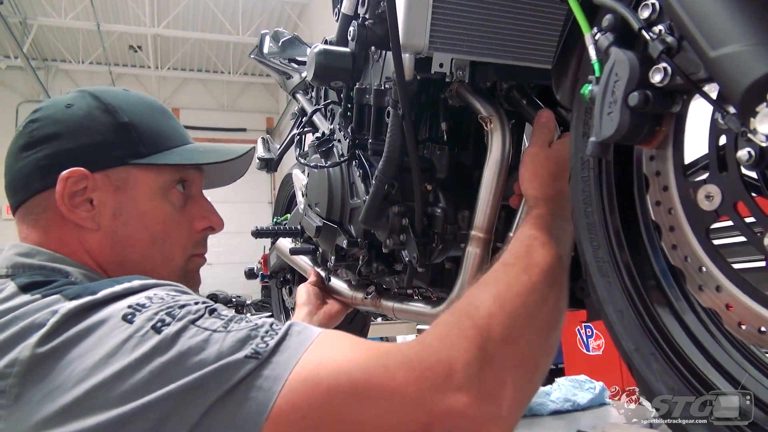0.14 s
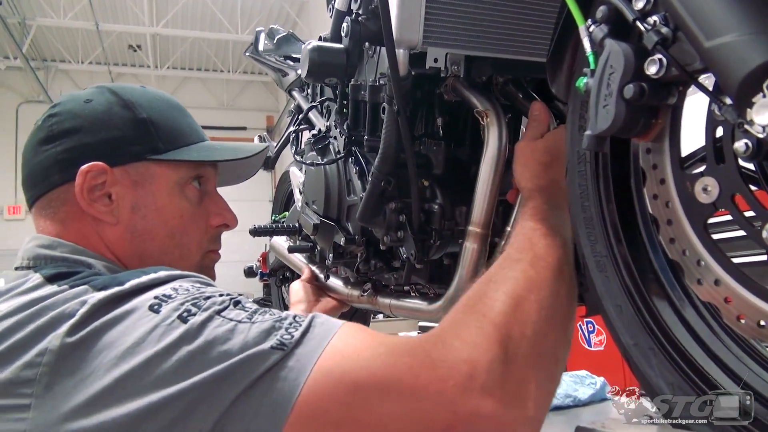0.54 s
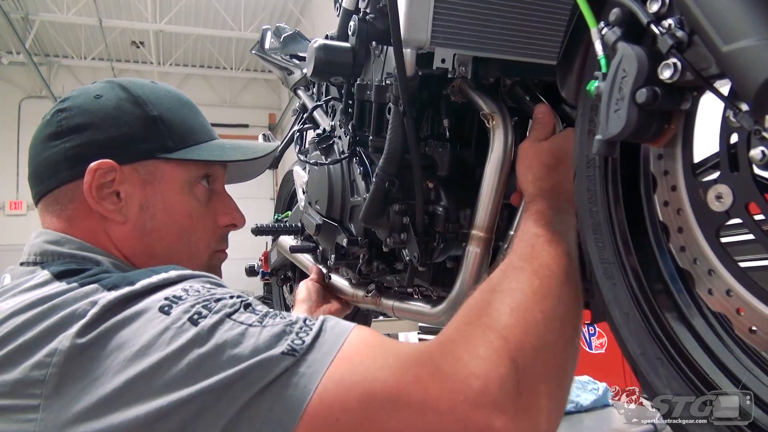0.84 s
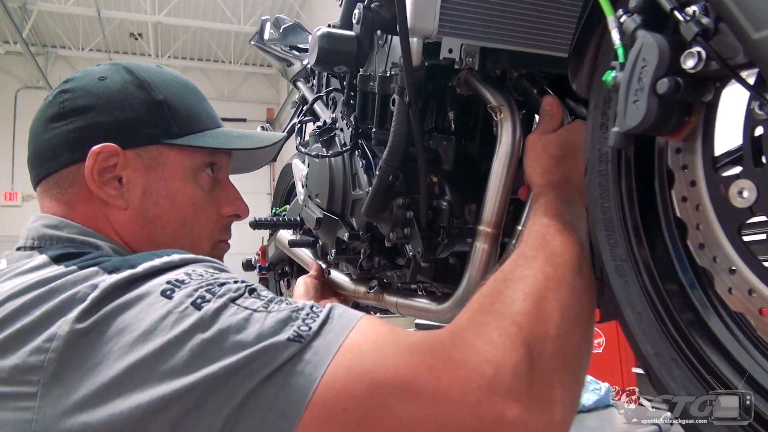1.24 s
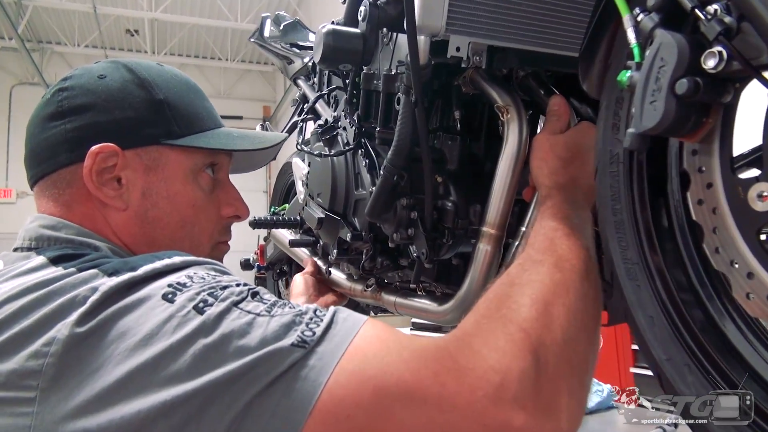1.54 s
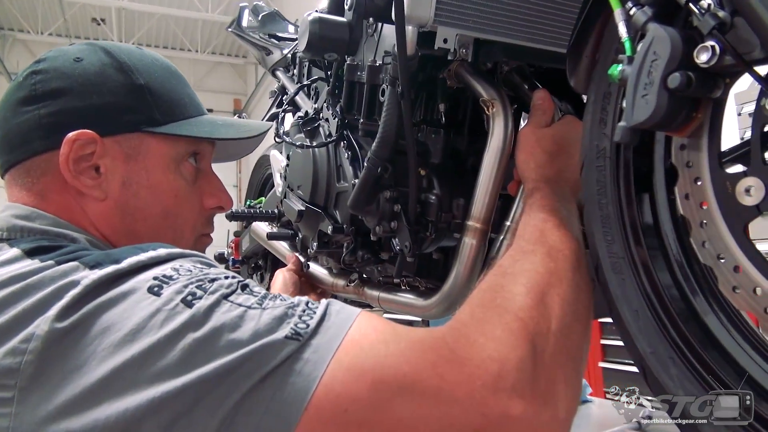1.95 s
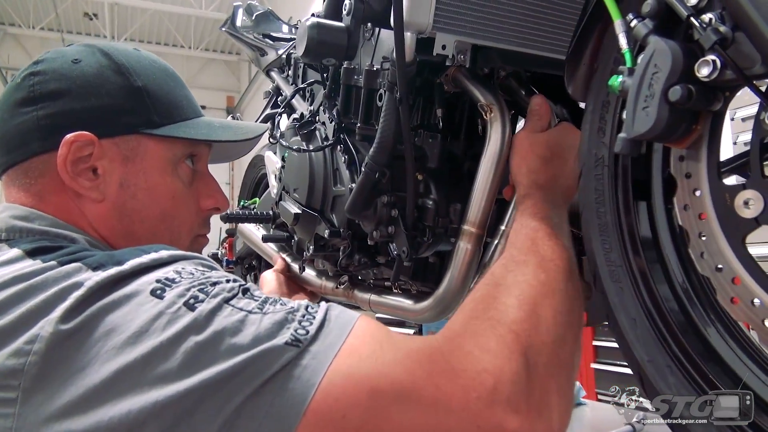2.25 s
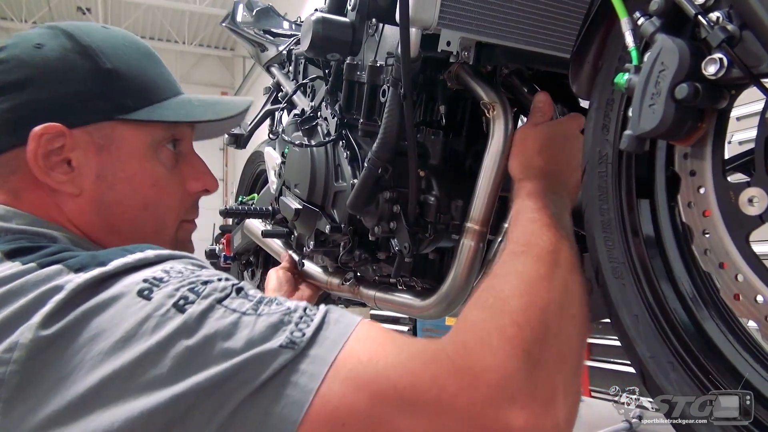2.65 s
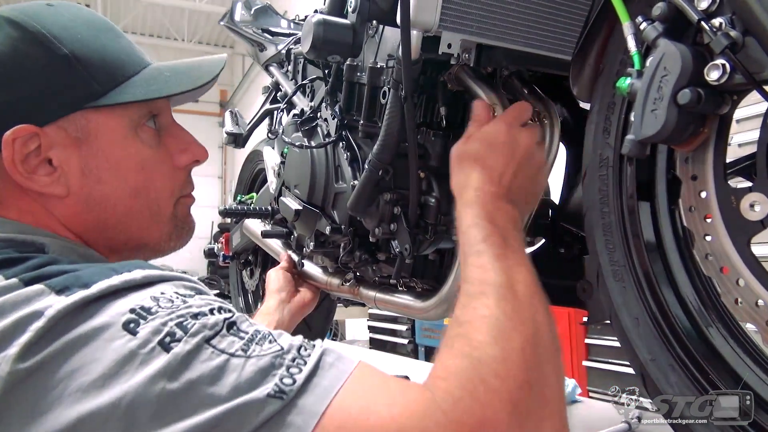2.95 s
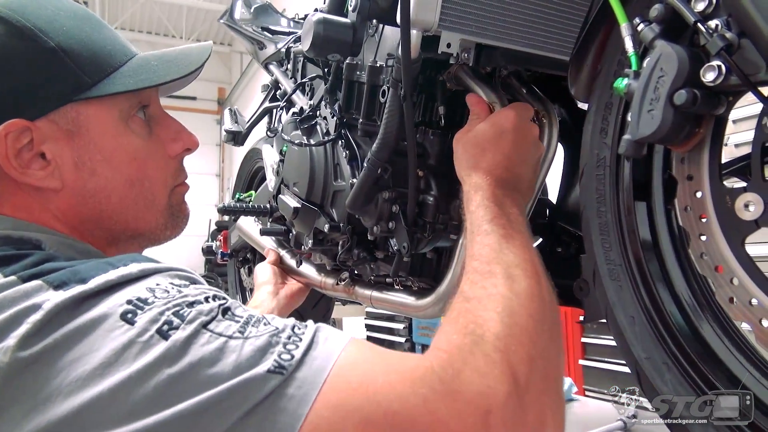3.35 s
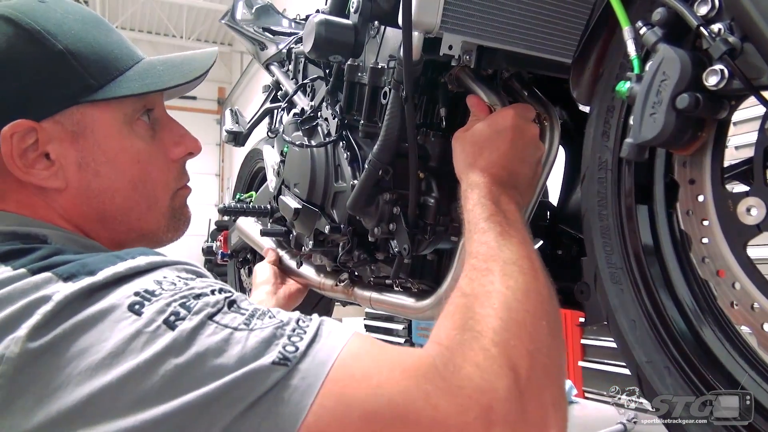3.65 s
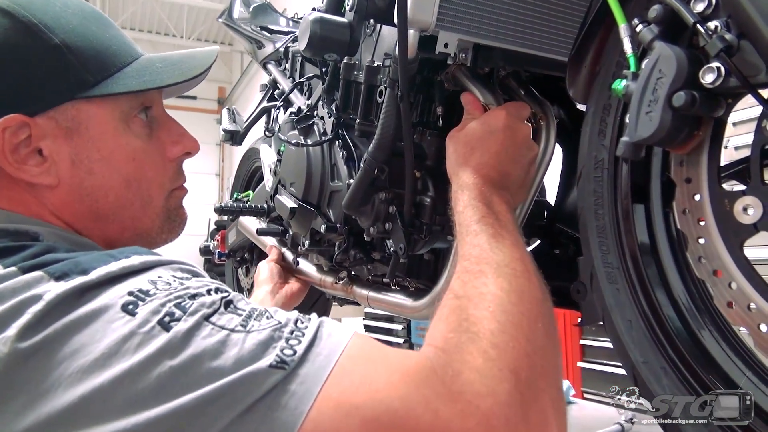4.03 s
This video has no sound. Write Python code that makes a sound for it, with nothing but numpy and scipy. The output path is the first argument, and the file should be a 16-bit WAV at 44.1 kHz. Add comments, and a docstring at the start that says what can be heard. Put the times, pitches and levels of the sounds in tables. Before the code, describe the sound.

A hand-held steel exhaust pipe knocks against a motorcycle's mounts, close by in a large workshop. Three short clanks grow louder, then come lighter taps with a small squeak and scrapes. Another firm clank follows, then a lull, the hardest clank and a light last knock. Each hit is quickly damped, leaving a faint ring and hall echo over a steady ventilation rumble.

```python
"""Short steel clanks, scrapes and squeaks echo in a large workshop over a ventilation rumble.
A hand-held stainless exhaust pipe is wiggled into place and knocks against a motorcycle's mounts.
Each knock shakes the pipe's natural tones (modes). The hands choke the clank within about 20 ms,
but a faint ring stays and the hall carries the sound on. Sliding steel and a shifting grip add friction.
A camera's gain control turns the hard knocks down and recovers slowly."""
import sys
import numpy as np
from scipy import signal
from scipy.fft import rfft, irfft
from scipy.io import wavfile
from scipy.ndimage import uniform_filter1d

SR = 44100
rng = np.random.default_rng(int(sys.argv[2]) if len(sys.argv) > 2 else 0)


def dump_mix(stems):
    """Bounce the given channels to the path in sys.argv[1] as a 16-bit WAV at rate SR."""
    frames = np.atleast_2d(stems).T  # one column per channel
    limited = np.clip(frames, -1, 1)  # hard clip at full scale
    pcm = np.round(limited * 32767).astype(np.int16)
    wavfile.write(sys.argv[1], SR, pcm)


N = 184635

# The tone color of the ventilation's rush. Each row: frequency in Hz, relative level in dB.
AIR_SPECTRUM = [(20, -6.5), (60, -7), (125, -3.5), (177, -13), (340, -18.5), (920, -21.5), (1400, -25),
                (1900, -29.5), (2800, -29.5), (3500, -27), (4500, -37), (7000, -44), (16000, -46)]
# The ventilation's low drones. Each row: pitch in Hz, spread to either side in Hz, level in dB.
AIR_DRONES = [(60.1, 3.7, -48), (101.2, 5.2, -44.5)]
# The pipe hits the mounts. Each row: start in seconds, level in dB, contact place from 0 to 2,
# then clatter and free ring in dB relative to the knock. A looser grip gives more ring.
KNOCKS = [ (0.4023, -13, 0, -12.5, -7), (.8738, -9.5, 0, -10.5, -10), (1.2403, -6.5, 0, -9.5, -7.5),
          (1.6496, -25, 1.5, 6, -9), (1.6705, -20.5, .5, -12.5, -8), (1.8846, -21.5, 1.8, -23, -6),
          (2.3735, -37.5, 1.6, 3, -10), (2.395, -8, 1, -6.5, -3.5), (2.638, -34, 1.2, -24, -4),
          (3.5355, -3, 2, -9, -1), (4.1282, -18.5, 1.4, -13, -13), ]
# The tones of the gripped pipe's wall. Each row: pitch in Hz, seconds to fade by 60 dB,
# then three relative levels in dB, for a hit at place 0, 1 and 2.
WALL_MODES = [ (221.7, 0.075, -37, -23, -28), (354.4, 0.042, -14.5, -15, -16.5),
              (402, 0.038, -11.5, -7.5, -11), (533, 0.028, -10, -7.5, -8.5), (1371, 0.038, -4, -11, -8),
              (1415, 0.037, -13, -2.5, -4), (1491.4, 0.053, -9, -10, -6), (1665, 0.03, -7.5, -11.5, -11.5),
              (1800, 0.017, -7, -13, -7.5), (2045, 0.057, -41, -22.5, -24.5), (2625, 0.05, -34, -8, -27.5),
              (2799, 0.035, -13.5, -2.5, -14), (2894, 0.033, -12, -8.5, -9.5),
              (2983, 0.032, -12, -11, -9.5), (3180, 0.05, -15, -28, -35), (3254, 0.065, -13.5, -14, -24.5),
              (3399, 0.034, -10.5, -29, -12.5), (3898, 0.024, -18.5, -13, -27),
              (4220, 0.095, -44, -21, -49), (4675, 0.07318, -46, -29, -24.5),
              (4829.3, 0.046, -21, -18, -38.5), (4942, 0.047, -21, -46, -26),
              (5590, 0.061, -30, -26, -25.5), (6710, 0.029, -57, -18, -47), (7446, 0.063, -26, -33.5, -30),
              (7560, 0.043, -25, -21, -41), (8310, 0.079, -35, -22.5, -32), (9470, 0.049, -28, -24, -46),
              (12320, 0.0295, -26, -33, -21.5), (13250, 0.015, -33, -41.5, -31), ]
# The crowd of weaker tones in pipe, flange and mounts. Each row: frequency in Hz, relative level in dB.
CLATTER_SPECTRUM = [(60, -19), (170, -6.5), (350, -3), (750, -9.5), (1100, -2), (2300, -4), (3700, 2.5),
                    (4400, -9), (5200, -4.5), (7000, -9.5), (11000, -10), (13500, -8), (15600, -19)]
# Faint tones the hands do not damp. Each row: pitch in Hz, seconds to fade by 60 dB, relative level in dB.
FREE_MODES = [(1587, 1.16, -26.5), (2914.8, 1.7, -31), (2860, 1.3, -24), (3370, 1.3, -36),
              (4830, 0.753, -54), (4990, 1.466, -50.5), (5400, 1.017, -55), (7400, 1.2, -44)]
# Close echoes from engine, bench and floor. Each row: delay in seconds, relative level in dB.
CLOSE_ECHOES = [(.0046, -27), (.0093, -27.5), (0.0139, -32), (0.018, -22.5)]
# How long the hall echoes. Each row: frequency in Hz, seconds to fade by 60 dB.
HALL_FADE = [(120, 0.4), (450, 0.85), (1400, 1.14), (3000, 1.22), (5000, 1.09), (8000, 0.93), (14000, 0.45)]
# How strongly the hall echoes. Each row: frequency in Hz, energy in dB relative to the direct sound.
HALL_STRENGTH = [(120, 6.5), (450, -5), (1400, -10.5), (2000, -8), (2850, -3.5), (3500, -6), (5000, -4),
                 (8000, -11), (14000, -12)]
# The pipe slides on its mounts; narrow bands squeak.
# Each row: time of the middle in seconds, level in dB, center pitch in Hz, width in octaves.
RUBS = [ (.585, -39.5, 434, 0.36), (.957, -33, 1290, 1), (1.648, -25.5, 1630, 0.18), (1.648, -28.5, 623, 1),
        (2.146, -45, 1200, .1), (2.378, -36.5, 1090, 0.53), (2.654, -33, 1310, .33),
        (3.29, -45.5, 1890, 0.59), (3.511, -51, 3300, 0.27), ]

# A firm knock sets the reference; a harder one is brighter and stays in contact longer.
FIRM_DB, FIRM_TILT_DB_PER_OCTAVE, FIRM_CONTACT_S = -9, -0.53, 0.0019
TILT_PER_DB, CONTACT_DOUBLING_DB = 0.11, 11.5
REGRIP_AT_S, REGRIP_SPREAD_S = 2.92, 0.05
SLIP_DB, SLIP_SPREAD_DB, SLIP_RISE_S = -59.5, 2, 0.016
SLIP_HZ, SLIP_RANGE_OCTAVES, SLIP_WIDTH_OCTAVES = 8350, 0.36, 0.12


def gain_of(db):
    """Turns decibels into a factor to multiply a sound by."""
    return 10 ** (np.asarray(db) / 20)


def evened(x, size=None):
    """Scales a sound so its average level (rms) is one, over all of it or its first size samples."""
    return x / np.sqrt(np.mean(x[:size] ** 2) + 1e-20)


def read(points, hz):
    """Looks up a frequency in a table, gliding between the rows."""
    f, value = np.transpose(points)
    return np.interp(np.log(hz + 1), np.log(f + 1), value)


def add(mix, start_s, sound):
    """Mixes a sound in at its start time."""
    part = mix[max(round(start_s * SR), 0):][:len(sound)]
    part += sound[:len(part)]


def noise(size, shape):
    """Noise of level one; shape(Hz) says how strong each frequency is."""
    spectrum = rfft(rng.standard_normal(size)) * shape(np.fft.rfftfreq(size, 1 / SR))
    return evened(irfft(spectrum, size))


def ring(t, hz, fade_s, db):
    """Adds up pure tones, each fading by 60 dB in its fade_s."""
    hz, fade_s, db = (np.reshape(column, (-1, 1)) for column in (hz, fade_s, db))
    phase = rng.random(hz.shape)
    loudness = gain_of(db) * np.exp(-np.log(1000) * t / fade_s)
    return (loudness * np.sin(2 * np.pi * (hz * t + phase))).sum(0)


def ventilation(rush_db=-41.5):
    """Moving air makes a steady rush with two wavering drones."""
    rush = gain_of(rush_db) * noise(N, lambda f: gain_of(read(AIR_SPECTRUM, f)))
    drones = sum(gain_of(db) * noise(N, lambda f: 1 / (1 + ((f - hz) / width) ** 2))
                 for hz, width, db in AIR_DRONES)
    return rush + drones


def hiss(level_db=-64.5, corner_hz=3200):
    """The faint, high hiss of one microphone channel."""
    return gain_of(level_db) * noise(N, lambda f: f ** 3 / (f ** 3 + corner_hz ** 3))


def knock(level_db, place, clatter_db, ring_db, pivot_hz=2000, grip_detune=0.0038):
    """One clank: where the pipe is hit picks its tones, and a harder hit favors the high ones."""
    t = np.arange(SR) / SR
    early = t[:SR // 8]
    attack = 660  # samples: the first 15 ms set the level
    tilt = FIRM_TILT_DB_PER_OCTAVE + TILT_PER_DB * (level_db - FIRM_DB)
    contact_s = FIRM_CONTACT_S * 2 ** ((level_db - FIRM_DB) / CONTACT_DOUBLING_DB)
    hz, fade_s, *place_db = np.transpose(WALL_MODES)
    hz = hz * (1 + grip_detune * rng.standard_normal(len(hz)))  # the grip shifts the pitches each time
    blend = np.maximum(1 - abs(place - np.arange(len(place_db))), 0)  # mix the nearest places
    mode_db = 20 * np.log10(blend @ gain_of(place_db)) + tilt * np.log2(hz / pivot_hz)
    # Each tone needs a few cycles to build up, so the low ones come late.
    walls = sum(ring(early, f, fade, db) * -np.expm1(-early * f / 3.0)
                for f, fade, db in zip(hz, fade_s, mode_db))
    press = -np.expm1(-early / contact_s)  # the force grows from 0 toward 1
    clank = evened(walls * press, attack)
    clank += gain_of(clatter_db) * evened(clatter(early, tilt, pivot_hz) * press, attack)
    sound = gain_of(ring_db) * ring(t, *np.transpose(FREE_MODES)) * (1 - t ** 2)
    add(sound, 0, evened(clank, attack))
    return gain_of(level_db) * sound


def clatter(t, tilt, pivot_hz, fade_s=0.06, spread_db=2.0, count=240):
    """A knock also shakes many weaker tones, unevenly; the high ones die first."""
    top_hz = CLATTER_SPECTRUM[-1][0]
    hz = (np.arange(count) + 1 + rng.random(count)) * top_hz / count
    db = read(CLATTER_SPECTRUM, hz) + tilt * np.log2(hz / pivot_hz)
    db += spread_db * rng.standard_normal(count)
    return ring(t, hz, fade_s / (1 + 0.48 * hz / top_hz), db)


def nearby(x):
    """The direct sound plus its first bounces off close surfaces."""
    out = x.copy()
    for delay_s, db in CLOSE_ECHOES:
        add(out, delay_s, gain_of(db) * x)
    return out


def hall(x, build_s=0.0068):
    """A wash of echoes swells quickly and fades band by band; each pipe position gets a new one."""
    hz, t, bands = signal.stft(rng.standard_normal(2 * SR), SR, nperseg=256)
    rate = np.log(1000) / read(HALL_FADE, hz)[:, None]
    strength = gain_of(read(HALL_STRENGTH, hz))[:, None] * np.sqrt(2 * rate / SR)
    bands = bands * strength * np.exp(-rate * t) * -np.expm1(-t / build_s)
    tail = signal.istft(bands, SR, nperseg=256)[1]
    return signal.fftconvolve(x, tail)[:N]


def rub(rise_s, hz, octaves):
    """Friction makes a short, grainy swell of noise that rises for rise_s and falls for as long."""
    size = int(2 * rise_s * SR)
    band = noise(size, lambda f: np.exp(-0.5 * (np.log2((f + 1) / hz) / octaves) ** 2))
    grain_db = 1.424 * evened(uniform_filter1d(rng.standard_normal(size), size=90))
    return evened(band * gain_of(grain_db)) * np.hanning(size) ** 2


def sliding(rise_s=0.03):
    """The pipe scrapes and squeaks as it slides on its mounts."""
    out = np.zeros(N)
    for middle_s, db, hz, octaves in RUBS:
        add(out, middle_s - rise_s, gain_of(db) * rub(rise_s, hz, octaves))
    return out


def regrip(count=9):
    """A hand shifts its grip along the steel in a cluster of faint, high slips."""
    out = np.zeros(N)
    for when, strength, pitch in rng.uniform(-1, 1, (count, 3)):
        slip = rub(SLIP_RISE_S, SLIP_HZ * 2 ** (SLIP_RANGE_OCTAVES * pitch), SLIP_WIDTH_OCTAVES)
        start_s = REGRIP_AT_S + REGRIP_SPREAD_S * np.arctanh(when)
        add(out, start_s, gain_of(SLIP_DB + SLIP_SPREAD_DB * strength) * slip)
    return out


def scene(hall_send_db=-0.75):
    """The pipe, close by and through the hall, over the ventilation; each channel has its own hiss."""
    friction = sliding() + regrip()
    direct, far = friction.copy(), hall(friction)
    for start_s, level_db, place, clatter_db, ring_db in KNOCKS:
        clank = knock(level_db, place, clatter_db, ring_db)
        add(direct, start_s, clank)
        add(far, start_s, gain_of(hall_send_db) * hall(clank))
    return nearby(direct) + far + ventilation() + np.array([hiss(), hiss()])


def record(dry, limit_db=-9.0, recovery_db_per_s=0.76, top_hz=15800):
    """Gain control turns loud knocks down and creeps back up; then the highest treble is cut."""
    power_db = 10 * np.log10(abs(uniform_filter1d((dry ** 2).mean(0), size=260)) + 1e-12)
    recovery_db = recovery_db_per_s * np.arange(N) / SR
    peak_db = np.maximum.accumulate(power_db + recovery_db) - recovery_db  # holds peaks, sinks slowly
    cut_db = uniform_filter1d(np.maximum(peak_db - limit_db, 0), size=60)
    held = np.clip(dry / gain_of(cut_db), -1, 1)
    low_pass = signal.firwin(255, top_hz, window=("kaiser", 9), fs=SR)
    return signal.oaconvolve(held, low_pass[None], "same")


dry = scene()
out = record(dry)
dump_mix(out)
```